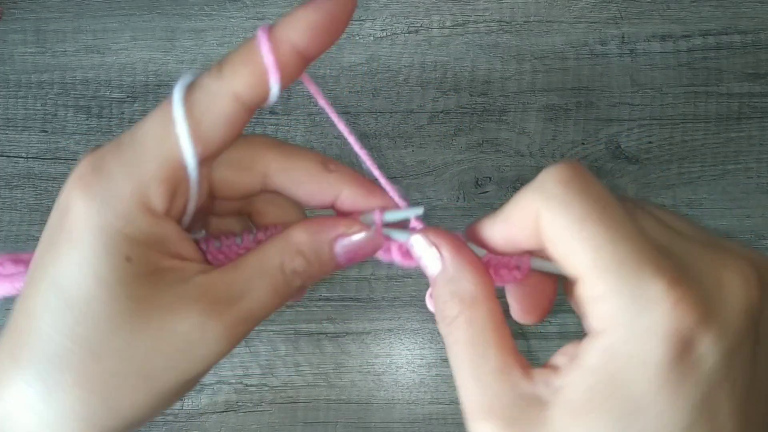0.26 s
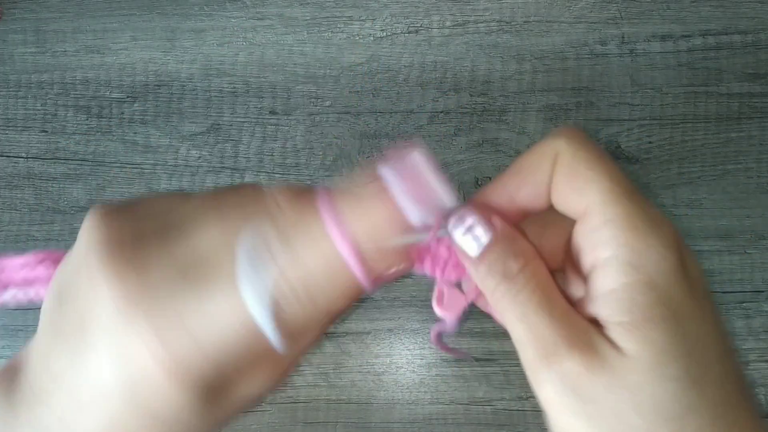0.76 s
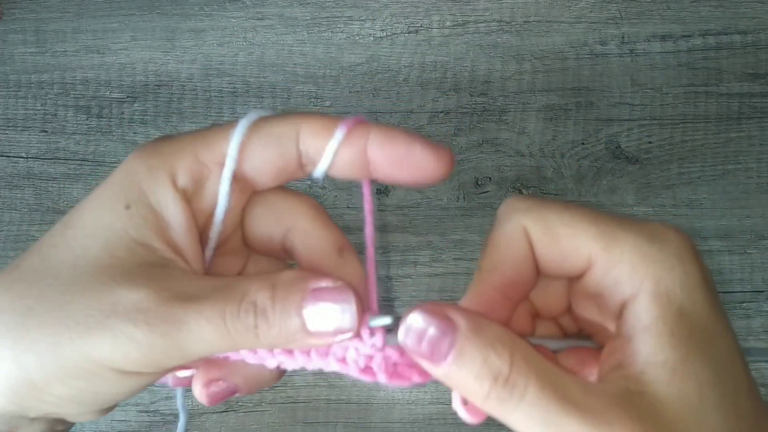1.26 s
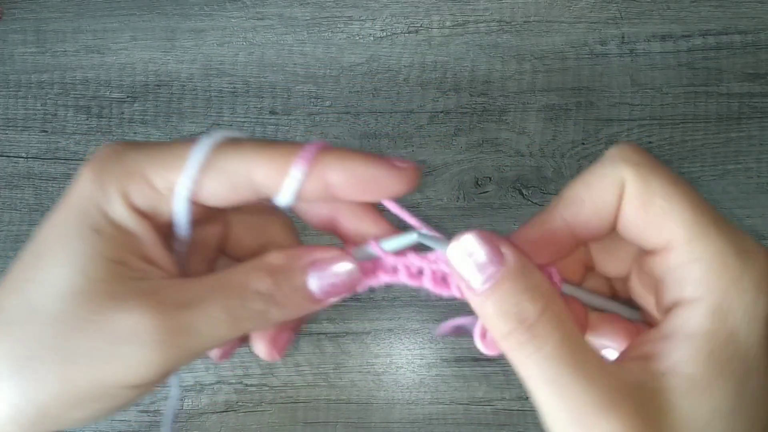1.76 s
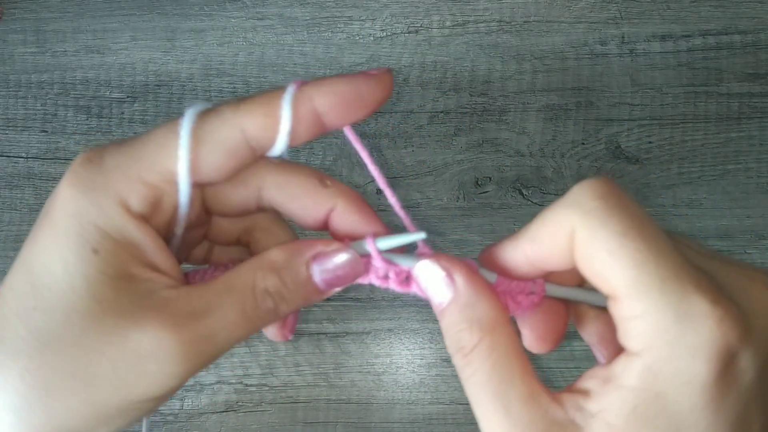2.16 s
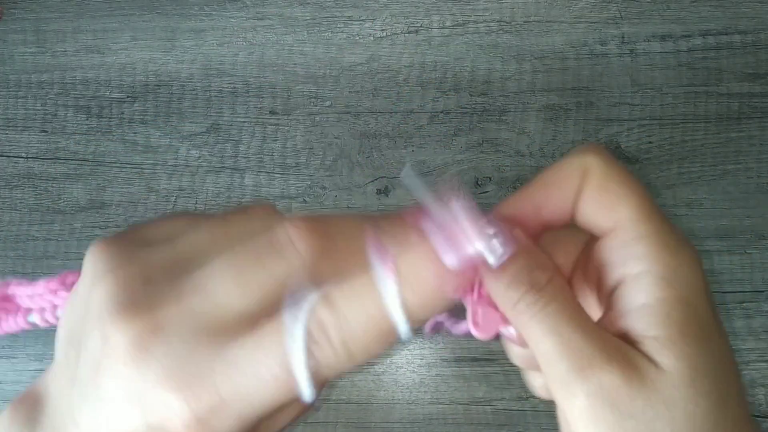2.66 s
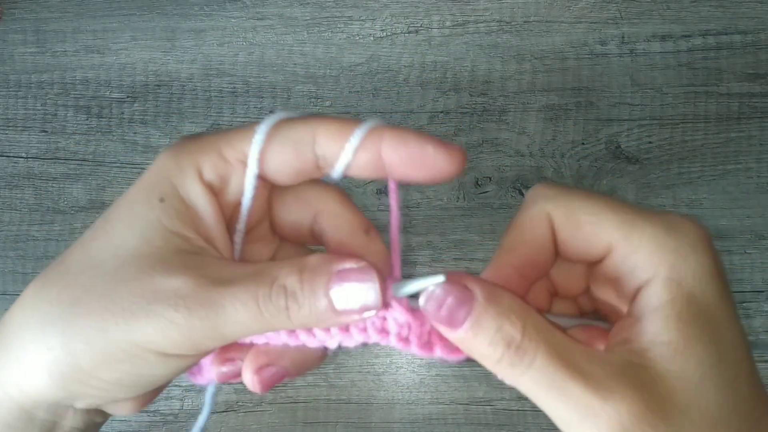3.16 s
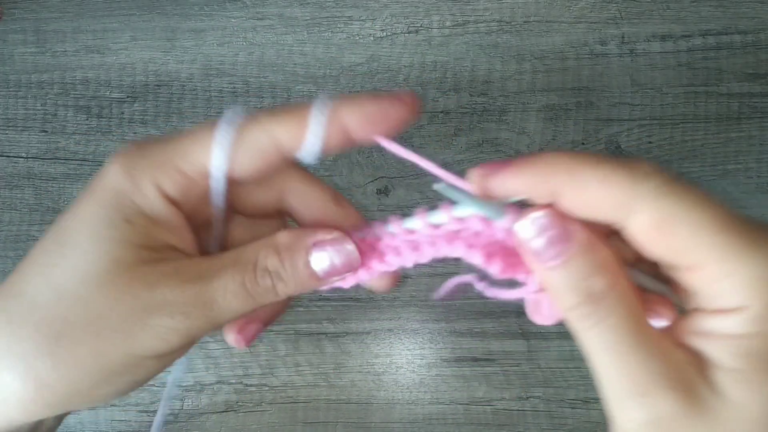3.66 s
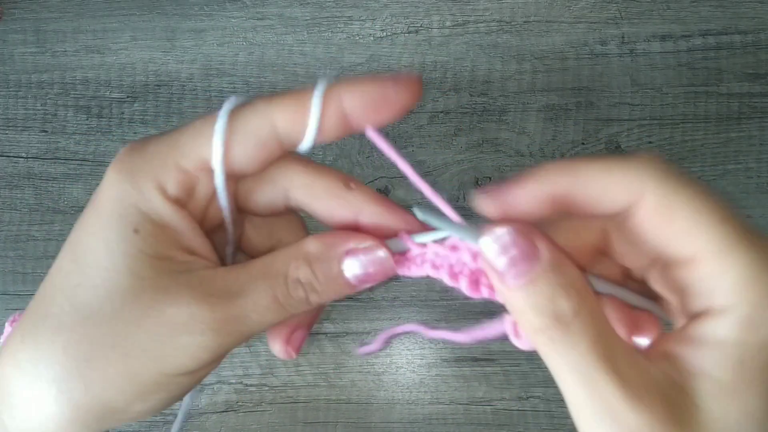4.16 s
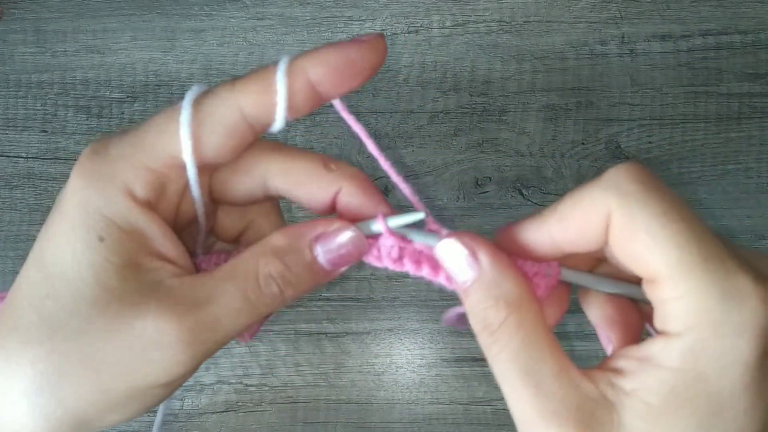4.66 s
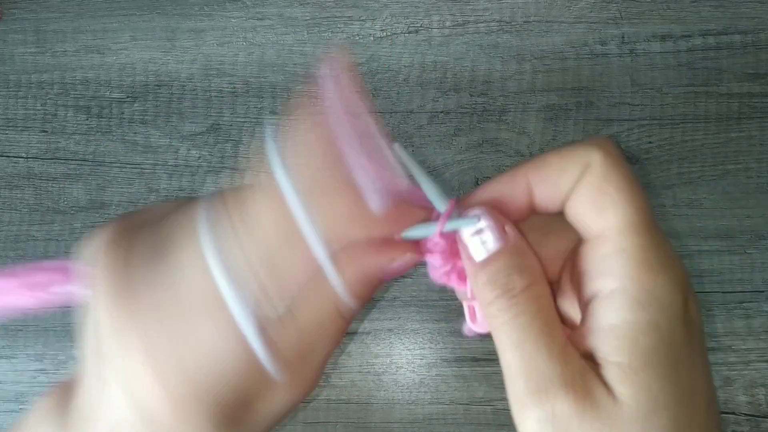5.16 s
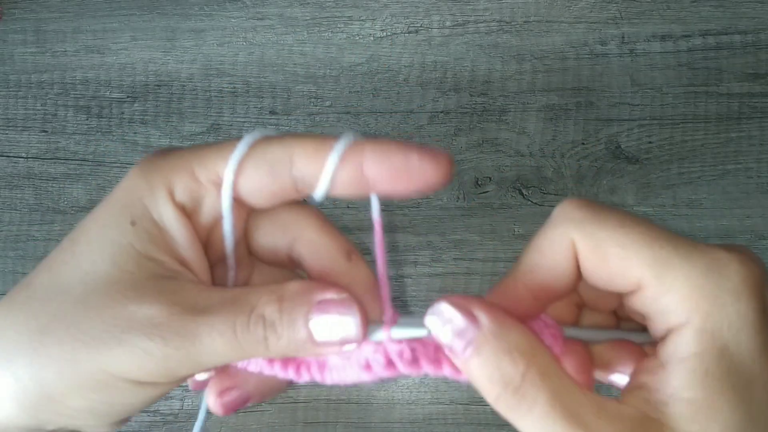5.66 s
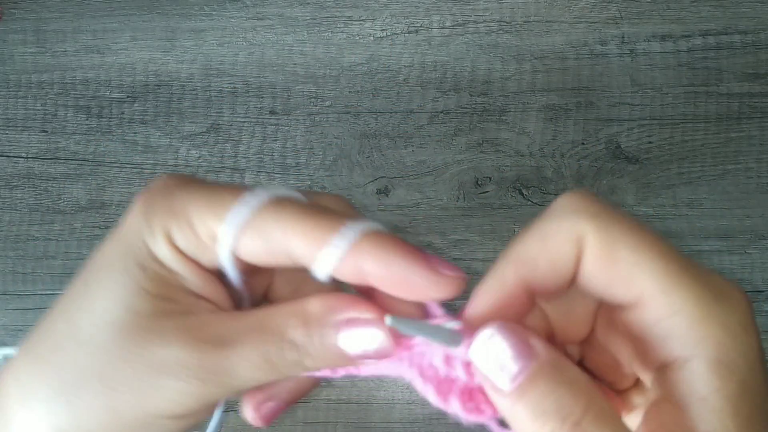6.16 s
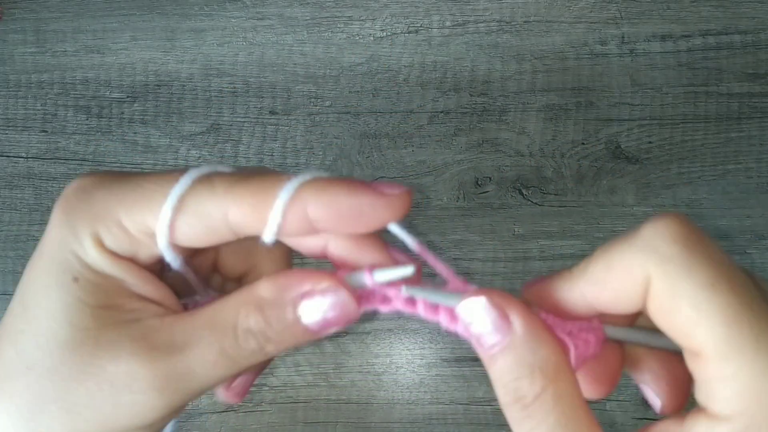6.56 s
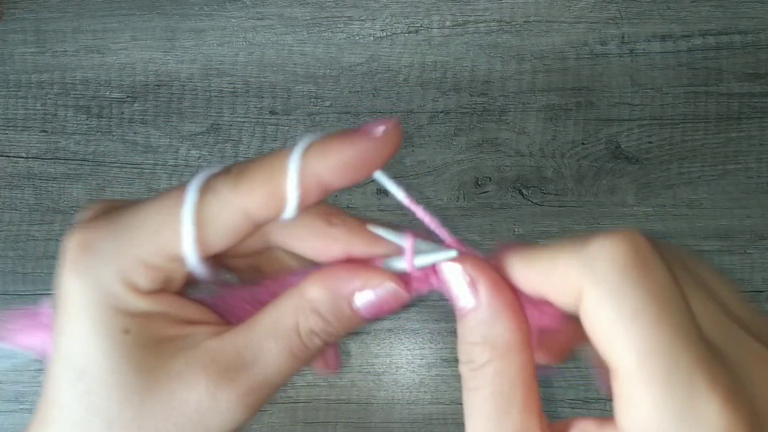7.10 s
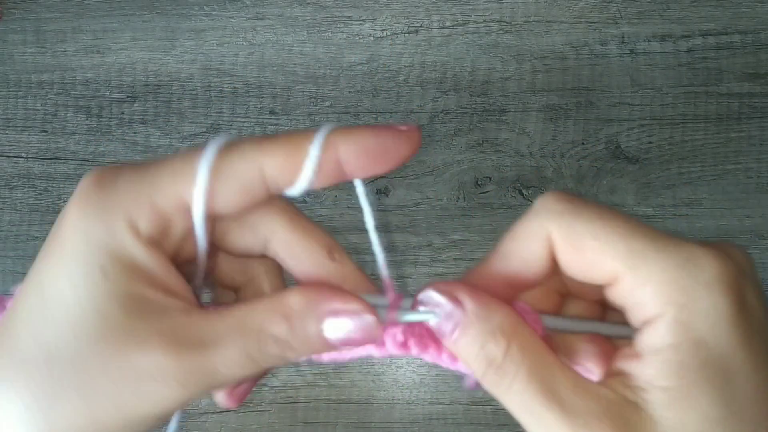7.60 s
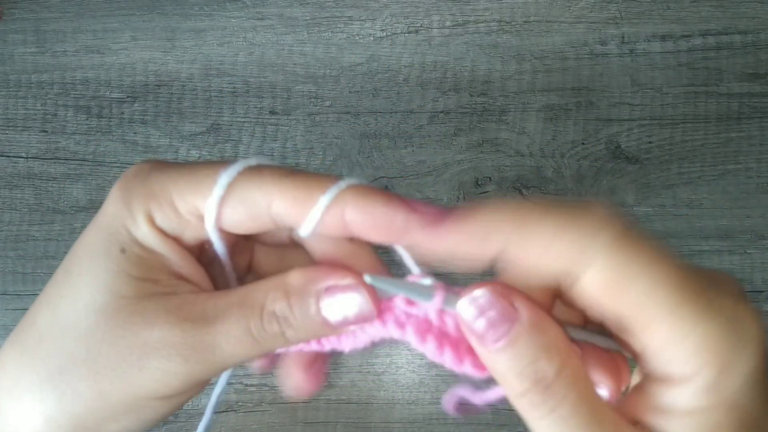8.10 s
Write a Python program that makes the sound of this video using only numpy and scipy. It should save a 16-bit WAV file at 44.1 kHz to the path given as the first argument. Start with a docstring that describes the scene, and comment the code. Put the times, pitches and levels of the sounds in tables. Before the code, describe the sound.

A quiet room, heard closely in stereo, with a faint low hum and light hiss throughout. Metal needle tips tick at the start and again near 0.35 and 0.45 s, the latter crisp, with dry bright yarn rubs around them. From 0.5 to 2 s there are mostly soft whispery strokes, firmer near 1.0 and 1.15. A tight cluster of ticks comes at 2.0, then lighter ones at 2.35, 2.6 and 2.9. At 3.2 a faint wooden knock rattles farther off. Rubbing continues, stronger at 3.7; a clear tick lands at 4.2, followed by more at 4.5, 4.7 and 4.95. A very deep slow sway enters after 4.2. Between 5 and 6.6 it is mainly gentle friction, with a small tick at 5.5. Ticks return at 6.7, 6.95, 7.05 and 7.6 among brisk strokes. A louder wooden knock comes at 8.1, then a weak tick and fading rub until 8.3.

```python
"""Knitting needles at close range

Two metal needles work stitches close under a pair of microphones in a quiet room.
Yarn and needles rub in short strokes (shaped noise that also excites needle modes); the tips tick
together and slide on (damped modes, then fading noise). Twice a wooden thing knocks farther off
(modes, rattle, reverberation). A low hum, a faint hiss and, later on, a slow sub-bass sway lie underneath."""
import sys
import numpy as np
from scipy import signal
from scipy.fft import rfft, irfft, next_fast_len
from scipy.io import wavfile

SR = 44100
rng = np.random.default_rng(int(sys.argv[2]) if len(sys.argv) > 2 else 0)


def wrap_up_sound(samples):
    """Save the sound to the file named by the first command line argument, as 16-bit audio."""
    columns = np.atleast_2d(samples).T
    # keep every value between -1 and 1, then stretch to whole-number steps
    tamed = np.clip(columns, -1, 1)
    steps = np.round(tamed * 32767).astype(np.int16)
    wavfile.write(sys.argv[1], SR, steps)


N = 367661


def from_db(db):
    """Decibel law: amplitude ratio of a level difference."""
    return 10 ** (np.asarray(db) / 20)


def rms_one(x):
    """Normalisation to unit root-mean-square."""
    return x / np.sqrt(np.mean(x ** 2) + 1e-20)


def level_over_time(points):
    """Linear interpolation of a level in dB between points in time."""
    times_s, level_db = np.transpose(points)
    return np.interp(np.arange(N) / SR, times_s, level_db)


def at_hz(points, hz):
    """Interpolation along a logarithmic frequency axis."""
    table_hz, values = np.transpose(points)
    return np.interp(np.log(hz), np.log(table_hz), values)


def panned(left_minus_right_db):
    """Interaural level difference: gains of the left and right side."""
    return from_db(np.array([left_minus_right_db / 2, -left_minus_right_db / 2]))


def bins(size):
    """Discrete Fourier frequencies in Hz, kept at 1 or more for the logarithm."""
    return np.maximum(np.arange(size // 2 + 1) * SR / size, 1)


def coloured(x, spectrum):
    """Spectral filtering: steady sound takes a spectrum's shape, silent outside it, at rms 1."""
    size = next_fast_len(N)
    hz = bins(size)
    inside = (hz > spectrum[0][0]) & (hz < spectrum[-1][0])
    shaped = rfft(x, size) * from_db(at_hz(spectrum, hz)) * inside
    return rms_one(irfft(shaped, size)[..., :N])


def ring(clicks, hz, t60):
    """Damped resonance: a unit click excites a decaying sine that starts from height 1."""
    r, w = from_db(-60 / (t60 * SR)), 2 * np.pi * hz / SR
    return signal.lfilter([0, np.sin(w)], [1, -2 * r * np.cos(w), r * r], clicks + 1e-18)


def drift(rate):
    """Low-passed random process of rms 1, changing about rate times a second."""
    steps_per_s = 100
    steps = rng.standard_normal(int(N / SR * steps_per_s) + 2)
    r = np.exp(-2 * np.pi * rate / steps_per_s)
    slow = rms_one(signal.lfilter([1], [1, -r], steps))
    return np.interp(np.arange(N) / SR * steps_per_s, np.arange(len(slow)), slow)


# Spectrum shape of the hiss: frequency_hz, relative_level_db (per Hz)
HISS_SPECTRUM = [(1200, -7), (2500, -17.5), (4000, -3), (7000, -6.5), (9500, -2.5), (13000, -7),
                 (15700, -8.5), (16100, -21)]


def hiss():
    """Stationary random noise, independent on the two sides, under a fixed spectrum."""
    level_db = -68
    return from_db(level_db) * coloured(rng.standard_normal((2, N)), HISS_SPECTRUM)


# Spectrum shape of the rumble: frequency_hz, relative_level_db (per Hz)
HUM_SPECTRUM = [(12, -30), (20, -3.5), (43, 1), (60, 2), (93, -12), (128, -8), (230, -16.5), (345, -15),
                (398, -17.5), (487, -17.5), (714, -24.5), (857, -18.5), (1480, -27), (2170, -31),
                (2500, -32), (3250, -35.5), (5500, -120)]
# Narrow resonances in the hum: frequency_hz, bandwidth_hz, level_db (added to the swell)
HUM_TONES = [(34, 14, 5.5), (128.9, 3.8, 4.5), (202.6, 1.8, -5), (286.2, 2.54, -2), (359.3, 16, -7.5)]
# Correlation of the left and right hum: frequency_hz, likeness (0 to 1)
HUM_COHERENCE = [(30, .98), (200, .93), (600, .75), (1500, .4), (2500, .1)]
# Common swell of the tones: time_s, level_db
HUM_SWELL = [(0.0, -80), (0.83, -72.5), (2.3, -72.5), (3.1, -66), (4.3, -70.5), (7.84, -73.5), (8.12, -73),
             (8.33, -79)]


def hum():
    """Partial coherence and delay: rumble of the house with wavering tones, arriving from the right."""
    rumble_db, left_late_samples = -55, 18
    size = next_fast_len(N)
    mid, side = rfft(rng.standard_normal((2, size)))
    alike = np.clip(at_hz(HUM_COHERENCE, bins(size)), 0, 1)
    # a shared mid and an opposed side, weighed to give that correlation
    pair_spectrum = np.sqrt(1 + alike) * mid + np.sqrt(1 - alike) * side * [[1], [-1]]
    pair = irfft(pair_spectrum, size)[:, :N]
    out = from_db(rumble_db) * coloured(pair, HUM_SPECTRUM)
    swell_db = level_over_time(HUM_SWELL)
    for tone_hz, width_hz, tone_db in HUM_TONES:
        t60 = np.log(1000) / np.pi / width_hz  # a narrower resonance rings longer
        tone = rms_one(ring(pair, tone_hz, t60))
        out = out + from_db(tone_db + swell_db) * tone
    return np.array([np.roll(out[0], left_late_samples), out[1]])


# Level of the sub-bass sway: time_s, level_db
SWAY_LEVEL = [(4.0, -72), (4.42, -40), (4.7, -64.5), (4.81, -48), (6.35, -41.5), (6.6, -61), (6.94, -39.5),
              (7.15, -51.5), (8.14, -48), (8.33, -60)]


def sway():
    """Infrasonic pressure variation: slow noise, alike on both sides."""
    swings = coloured(rng.standard_normal(N), [(1.5, 12.5), (5, 19.5), (22, -15.5)])
    return from_db(level_over_time(SWAY_LEVEL)) * swings


def blows(events, modes, edges_hz, spread_s, gain_db, scatter_db, right_late_s, count):
    """Modal superposition: each blow's force, split over count quick contacts, excites damped modes."""
    out = np.zeros((2, N))
    jitter = 0.24 * rng.random((len(events), count))
    late_s = (np.arange(count) + jitter) / count * spread_s
    signs = rng.choice([-1, 1], (len(events), count))
    strength = from_db(scatter_db * rng.standard_normal((len(events), len(modes), 2, 1)))
    for k, (hz, mode_db, t60) in enumerate(modes):
        clicks = np.zeros((2, N))
        # interference of the contacts at this mode, partly evened out in the gain
        together = abs(np.sum(signs * np.exp(2j * np.pi * hz * late_s), axis=1)) ** 2
        evening = np.sqrt(2 * count / (count + together))
        for e, (start_s, peak_db, *rest) in enumerate(events):
            *low_db, high_db, pan_db = rest[:len(edges_hz) + 1]
            # the group next to the highest is the 0 dB reference
            group_db = [*low_db, 0, high_db][np.searchsorted(edges_hz, hz)]
            gain = from_db(peak_db + gain_db + mode_db + group_db) * panned(pan_db) * evening[e]
            for side in (0, 1):
                at = ((start_s + late_s[e] + side * right_late_s) * SR).astype(int)
                np.add.at(clicks[side], at, gain[side] * strength[e, k, side] * signs[e])
        # low modes push together, high ones fill each other's gaps
        polarity = (-1) ** k if hz > 1000 else 1
        out += polarity * ring(clicks, hz, t60)
    return out


# Reverberation time of the room: frequency_hz, t60_s
ROOM_T60 = [(200, 0.14), (1000, 0.33), (2900, 0.33), (4000, 0.17), (8000, 0.03)]


def room(x):
    """Diffuse reverberation: convolution with noise decaying at its own rate per band, unlike per side."""
    t, tail = np.arange(SR // 2) / SR, 0
    edges = 150 * 2 ** np.arange(0, 6.1, .5)  # half octaves
    for low, high in zip(edges, edges[1:]):
        band_pass = signal.butter(2, [low, high], "band", fs=SR, output="sos")
        band = signal.sosfilt(band_pass, rng.standard_normal((2, len(t))))
        tail = tail + band * from_db(-60 * t / at_hz(ROOM_T60, np.sqrt(low * high)))
    after_gap = t > .004
    return signal.fftconvolve(x, tail * after_gap, axes=1)[:, :N]


# Contacts of the two knocks: start_s, relative_level_db, thump_db, body_db, crack_db, left_minus_right_db
KNOCKS = [(3.2015, -41, -25, -2, 9, 0), (3.2035, -39.5, -19, 1, 2, -6), (3.2055, -37, -7.5, 5.5, -5, 5),
          (3.2215, -44, -8, 10, -4, -1), (8.1163, -29.5, 1, 2, 4.5, -5), (8.1189, -20, -8.5, -6.5, -4, 1),
          (8.123, -32, 1, 1, -8, 1), (8.129, -37, -4, 8, -11, -2)]
# Modes of the knocked body: frequency_hz, relative_level_db, t60_s
BODY_MODES = [(121, -6, 0.063), (313, -14, 0.049), (382, 6, 0.022), (617, 8, 0.0094), (755, -0.5, 0.017),
              (1214, 3.5, 0.0089), (1235, 4, 0.0059), (1600, 4.5, 0.0064), (1890, 7.5, 0.0054),
              (2270, 4, 0.0092), (2740, 4, 0.0095), (3280, 6, 0.006), (3660, 9, 0.0037),
              (5700, 14.5, 0.00084)]
BODY_GROUPS_HZ = 700, 2100, 3400  # borders: thump, body, reference, crack


def knocking():
    """Impact, repeated contact and reverberation: a rattling knock on something wooden, twice."""
    room_db = -30.5
    rattle_per_s, rattle_db, rattle_t60_s = 690, -28, 0.33
    knocks = blows(KNOCKS, BODY_MODES, BODY_GROUPS_HZ, spread_s=0.0008, gain_db=-11.0,
                   scatter_db=3.5, right_late_s=-0.000065, count=1)
    # loose parts chatter on after each contact
    t = np.arange(SR // 3) / SR
    happens = rng.random((2, len(t))) < rattle_per_s / SR
    touches = happens * rng.standard_normal((2, len(t)))
    fading_touches = touches * from_db(rattle_db - 60 * t / rattle_t60_s)
    rattle = signal.fftconvolve(knocks, fading_touches, axes=1)[:, :N]
    return knocks + rattle + from_db(room_db) * room(knocks)


# Tips meeting: start_s, relative_level_db, lowest_modes_db, low_modes_db, high_modes_db,
# left_minus_right_db, slide_db (the slide after it, against relative_level_db)
TICKS = [(0.014, -34.5, -17, -18, -9, 3.5, -11.5), (0.3538, -40.5, -26, -26, 8, 15.5, -22),
         (0.4509, -26, -1, 2.5, -2, 1, -11.5), (2.0224, -41, -12, -12, -3, 4, -11),
         (2.025, -33.5, -16, -12, 2, 2, -18), (2.0264, -32.5, -14, -8, -8, 8, -21),
         (2.3498, -39, -18, -16, 3, 9, -24), (2.608, -48.5, 7, 5, 3, 2.5, -16),
         (2.896, -34.5, -12, -2, 2, -2, -14.5), (4.229, -44, -15, -10, 8, 7, -20),
         (4.2316, -23, 0, -10, 0, 1.5, -13.5), (4.5159, -27, -14, -19, -6, 4, -18.5),
         (4.7158, -35, -16, -14, -1, 5, -19), (4.948, -38, -14, -14, 0, 0, -20),
         (4.9504, -26, -10, -14, 2, 1, -17.5), (5.497, -38, -22, -18, 0, 3, -6.5),
         (6.6947, -30, -13, -15, -3, 1.5, -23), (6.949, -31.5, -14, -17, 1, 3, -22),
         (7.055, -34, -15, -15, 10.5, 11, -22), (7.0571, -29.5, -16, -4, 3, -1, -12.5),
         (7.5713, -34, -25, -25, 8.5, 3, -8.5), (8.193, -43, 4, 7, -5, 5, -22)]
# Modes of the needle tips: frequency_hz, relative_level_db, t60_s
NEEDLE_MODES = [(3560, -22, 0.0061), (5000, -6, 0.0033), (6030, 1, 0.0025), (7620, -3, 0.0028),
                (8500, 1, 0.0029), (9790, 6, 0.0068), (11200, -5, 0.0027), (12800, -1.5, 0.0039),
                (14300, 0.5, 0.0035), (15200, -8, 0.0033)]
NEEDLE_GROUPS_HZ = 4300, 6500, 11000  # borders: lowest, low, reference, high


def needles():
    """Radiation efficiency: struck tips ring in modes, and being thin radiate almost nothing low."""
    ticks = blows(TICKS, NEEDLE_MODES, NEEDLE_GROUPS_HZ, spread_s=0.001, gain_db=-6,
                  scatter_db=1.5, right_late_s=.00025, count=4)
    high_pass = signal.butter(3, 2600, "high", fs=SR, output="sos")
    return signal.sosfilt(high_pass, ticks)


def fibres(grain_db, shared):
    """Stick-slip noise: dense snags of uneven size, common to both sides, in mostly separate sound."""
    sizes = from_db(grain_db * np.minimum(rng.exponential(1, N), 5))
    both, *own = rng.standard_normal((3, N))
    return sizes * (shared * both + np.array(own))


def patchy(x, patchy_db, rate):
    """Band-wise modulation: each slice swells and fades by itself as different fibres catch."""
    size, out, width_hz = next_fast_len(N), 0, 1000
    hz, spectrum = bins(size), rfft(x, size)
    for centre in np.arange(1000, 17001, width_hz):
        share = np.clip(1 - abs(hz - centre) / width_hz, 0, 1)  # overlapping triangles
        band = irfft(spectrum * share, size)[:, :N]
        out = out + band * from_db(patchy_db * drift(rate))
    return out


def singing():
    """Forced resonance: snags ring the upper needle modes, each wavering as the grip shifts; rms 1."""
    t60_s, wavers_db = 0.0032, 9
    snags = fibres(2.5, .35)
    out = 0
    for hz, mode_db, _ in NEEDLE_MODES:
        if 5000 < hz < 15000:
            mode = rms_one(ring(snags, hz, t60_s))
            out = out + from_db(mode_db + wavers_db * drift(13.0)) * mode
    return rms_one(out)


# Strokes of yarn and needle: start_s (of full pressure), rise_s, hold_s, fall_s, level_db,
# dull_db (dull part against the bright)
STROKES = [(0.078, 0.045, 0.018, 0.084, -52, -27), (0.251, 0.019, 0.018, 0.052, -46.5, -21),
           (0.334, 0.0087, 0.01, 0.013, -43, -27), (0.365, 0.061, 0, 0.055, -53, -20),
           (0.426, 0.017, 0.0074, 0.21, -48, -18), (0.475, 0.21, 0.035, 0.094, -57.5, -5.5),
           (0.68, 0.024, 0.0086, 0.026, -55, -10), (0.814, 0.35, 0.03, 0.2, -63.5, -12),
           (0.986, 0.12, 0.014, 0.087, -50, -11), (1.155, 0.026, 0.0065, 0.029, -47, -13),
           (1.365, 0.38, 0.086, 0.11, -57.5, -10.5), (1.48, 0.014, 0.0001, 0.026, -53.5, -17),
           (1.56, 0.057, 0.13, 0.038, -60, -10.5), (1.709, 0.062, 0.013, 0.1, -56, -6),
           (2.064, 0.032, 0.14, 0.008, -59, -23), (2.236, 0.091, 0.011, 0.0091, -51, -19),
           (2.326, 0.016, 0.16, 0.031, -49.5, -19), (2.52, 0.55, 0.022, 0.16, -63.5, -3.5),
           (2.74, 0.07, 0, 0.14, -57.5, -6), (2.865, 0.14, 0.074, 0.19, -54.5, -11),
           (3.049, 0.038, 0.0075, 0.041, -47, -10), (3.197, 0.038, 0.04, 0.19, -55, -2.5),
           (3.493, 0.13, 0.036, 0.072, -55, -9.5), (3.71, 0.14, 0, 0.27, -47, -13),
           (3.857, 0.28, 0.062, 0.009, -54, -6), (4.087, 0.11, 0.0096, 0.058, -58, -9),
           (4.17, 0.073, 0, 0.087, -57.5, -5.5), (4.54, 0.0086, 0.0, 0.415, -62.5, -16),
           (4.636, 0.012, 0.016, 0.027, -47.5, -27), (4.793, 0.058, 0.022, 0.08, -52.5, -18),
           (4.839, 0.012, 0.021, 0.027, -46.5, -21), (4.974, 0.093, 0.023, 0.1, -47, -17),
           (5.382, 0.0067, 0.044, 0.015, -57, -9.5), (5.54, 0.47, 0.13, 0.008, -58.5, -9),
           (5.674, 0.034, 0.00054, 0.054, -50.5, -13), (5.883, 0.1, 0.026, 0.09, -58, -9),
           (6.112, 0.086, 0.027, 0.056, -58.5, -7.5), (6.232, 0.052, 0.0028, 0.043, -54, -9.5),
           (6.292, 0.062, 0.012, 0.038, -60, -8), (6.37, 0.093, 0.025, 0.11, -55.5, -10),
           (6.74, 0.055, 0.1, 0.022, -58.5, -22), (6.932, 0.015, 0.012, 0.042, -46, -14),
           (7.116, 0.14, 0.028, 0.085, -47.5, -14.5), (7.27, 0.066, 0.01, 0.101, -62.5, -4.5),
           (7.503, 0.12, 0.056, 0.077, -55, -12.5), (7.63, 0.209, 0.023, 0.139, -58, -10),
           (7.737, 0.075, 0, 0.048, -51, -11), (7.92, 0.17, 0.016, 0.21, -58, -7.5),
           (8.162, 0.07, 0.019, 0.047, -49.5, -4.5), (8.29, 0.024, 0.011, 0.064, -56, -6)]


def strokes():
    """Friction envelopes, bright and dull, per side: strokes rise, hold and fall; a slide trails each tick."""
    edge_curve = 1.25  # rise and fall are the times to and from 20 dB under full, bent by this power
    resting_db, resting_dull_db = -72, -28  # fingers never quite leave the yarn
    base_pan_db, pan_per_dull_db = -0.5, -0.13  # the brighter a stroke, the further left it sits
    skid_t60_s, slide_under_skid_db = 0.029, -3.5  # the slide starts as a short, harder skid
    slide_t60_s, slide_dull_db, slide_sets_in_s = 0.2, -16, 0.00099
    t = np.arange(0, N, 16) / SR
    # powers add, since the strokes are incoherent
    bright = np.full((2, len(t)), from_db(resting_db) ** 2)
    dull = bright * from_db(resting_dull_db) ** 2
    for start_s, rise, hold, fall, level_db, dull_db in STROKES:
        before = np.maximum(start_s - t, 0) / max(rise, .005)
        after = np.maximum(t - start_s - max(hold, 0), 0) / max(fall, .005)
        envelope = from_db(level_db - 20 * (before + after) ** edge_curve)
        pan_db = np.clip(base_pan_db + pan_per_dull_db * dull_db, -2, 9)
        power = (envelope * panned(pan_db)[:, None]) ** 2
        bright = bright + power
        dull = dull + power * from_db(dull_db) ** 2
    for start_s, peak_db, *_, pan_db, slide_db in TICKS:
        since = np.maximum(t - start_s, 0)
        skid = from_db(-60 * since / skid_t60_s)
        slide = from_db(slide_under_skid_db - 60 * since / slide_t60_s)
        onset = np.clip((t - start_s) / slide_sets_in_s, 0, 1)
        envelope = from_db(peak_db + slide_db) * (skid + slide) * onset
        power = (envelope * panned(pan_db)[:, None]) ** 2
        bright = bright + power
        dull = dull + power * from_db(slide_dull_db) ** 2
    times = np.arange(N) / SR
    return [np.sqrt([np.interp(times, t, side) for side in part]) for part in (bright, dull)]


# Spectrum shape of the bright rub: frequency_hz, relative_level_db (per Hz)
BRIGHT_SPECTRUM = [(2000, -37), (5500, -16), (6800, -8), (7800, -3), (9550, 3.5), (11500, -1),
                   (13500, -4.5), (15300, -3.5), (15900, -23), (16100, -39)]
# Spectrum shape of the dull rub: frequency_hz, relative_level_db (per Hz)
DULL_SPECTRUM = [(1200, -6.5), (2500, 2), (4000, 2.5), (6500, 6), (9000, -2)]


def rubbing():
    """Dry friction: yarn over metal and skin, bright snags with a duller part, fluttering in pressure."""
    singing_db = -11  # against the patchy snags
    bright_pressure, dull_pressure = strokes()
    flutter = from_db(1.42 * drift(45))
    snags = patchy(coloured(fibres(2.1, .35), BRIGHT_SPECTRUM), patchy_db=2.4, rate=9)
    bright = rms_one(snags + from_db(singing_db) * singing())
    # the shared part of the dull rub is opposed on the two sides
    dull = coloured(fibres(1.5, 0.098) * [[1], [-1]], DULL_SPECTRUM)
    return flutter * (bright_pressure * bright + dull_pressure * dull)


def scene():
    """Linear superposition of all sources."""
    return hiss() + hum() + sway() + knocking() + needles() + rubbing()


def record(dry):
    """Low-pass filtering: the top is cut steeply."""
    stop_hz = 16900
    return signal.sosfilt(signal.cheby2(14, 70, stop_hz, fs=SR, output="sos"), dry)


dry = scene()
out = record(dry)
wrap_up_sound(out)
```